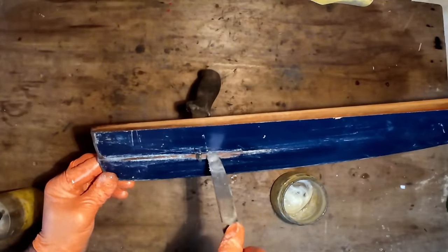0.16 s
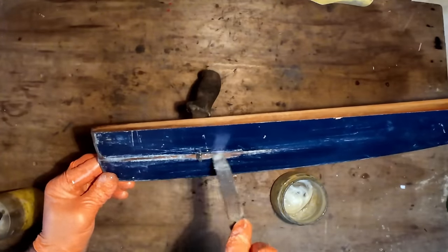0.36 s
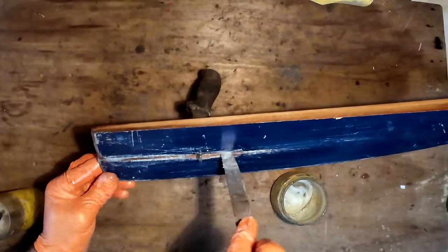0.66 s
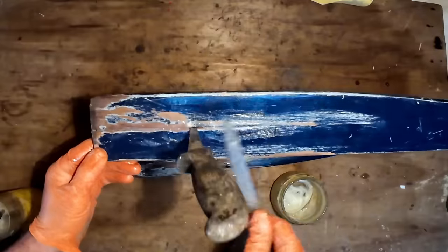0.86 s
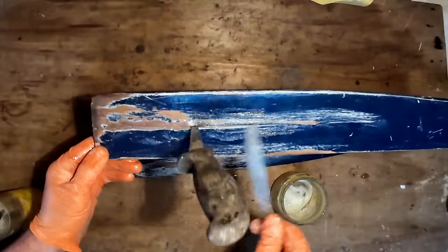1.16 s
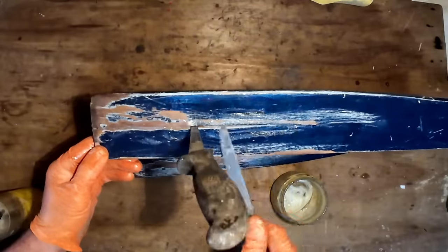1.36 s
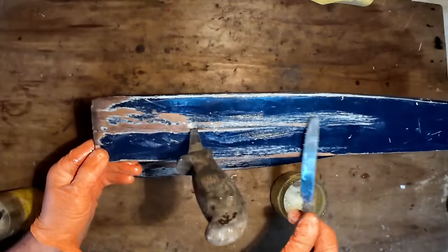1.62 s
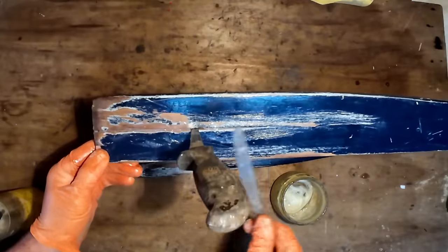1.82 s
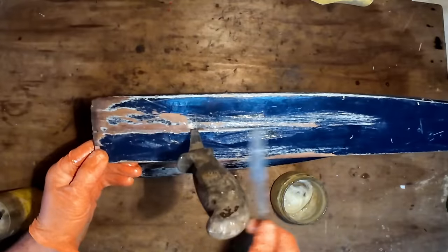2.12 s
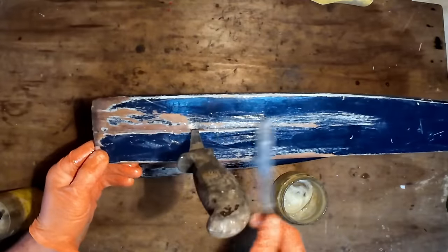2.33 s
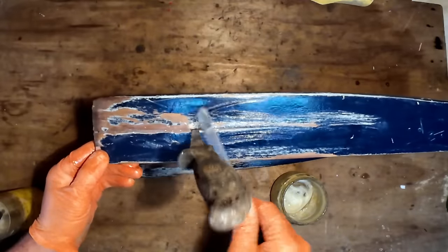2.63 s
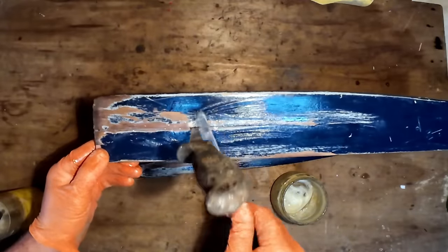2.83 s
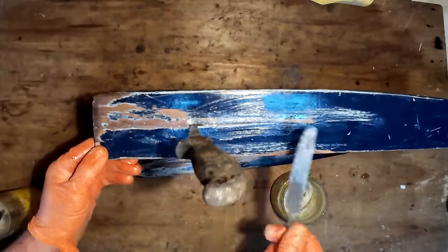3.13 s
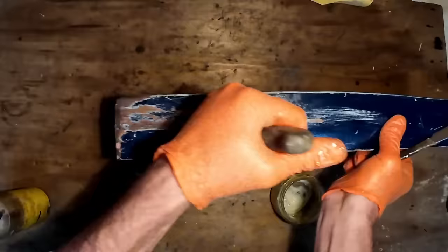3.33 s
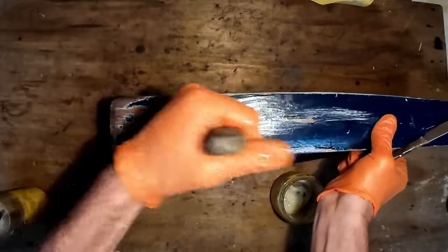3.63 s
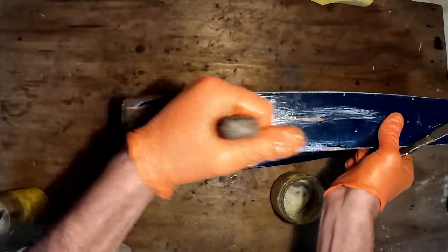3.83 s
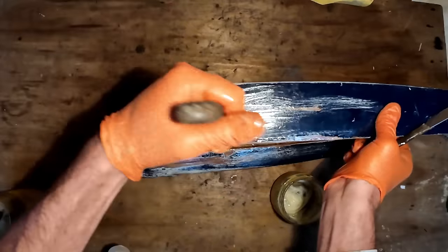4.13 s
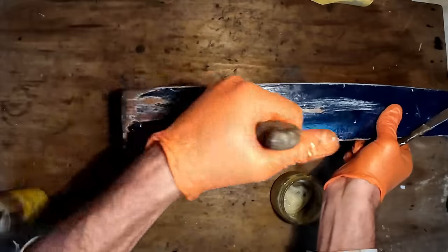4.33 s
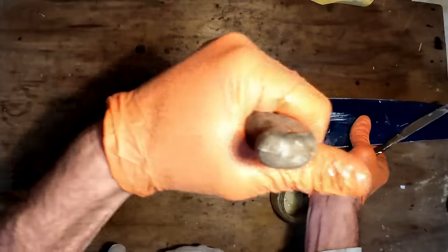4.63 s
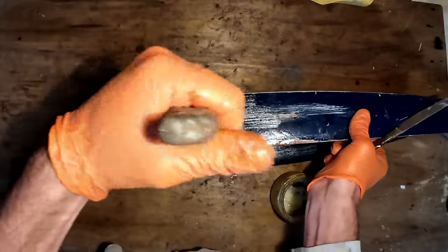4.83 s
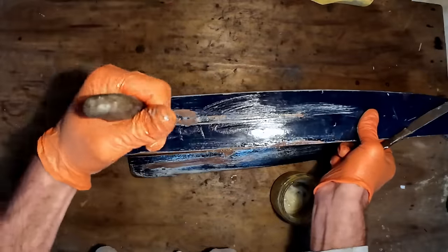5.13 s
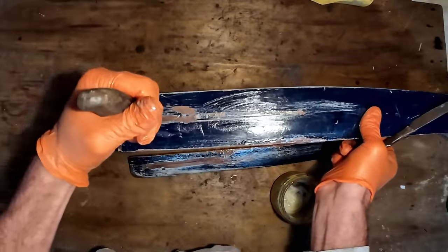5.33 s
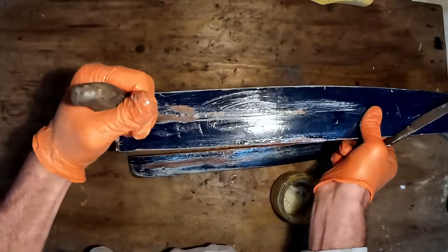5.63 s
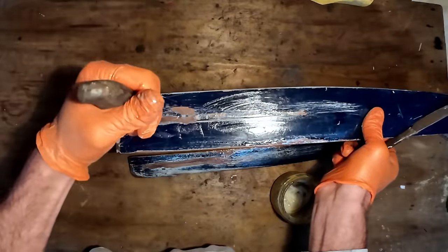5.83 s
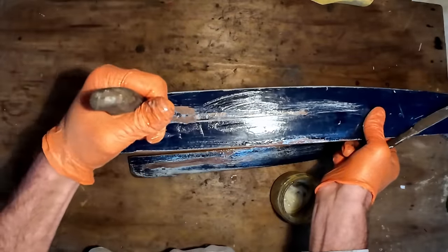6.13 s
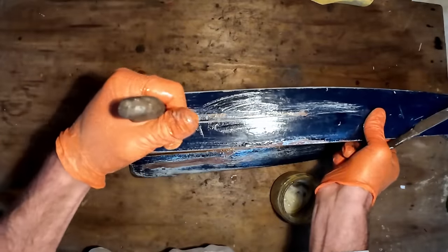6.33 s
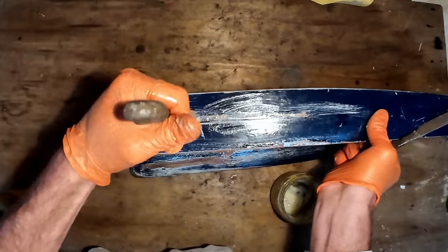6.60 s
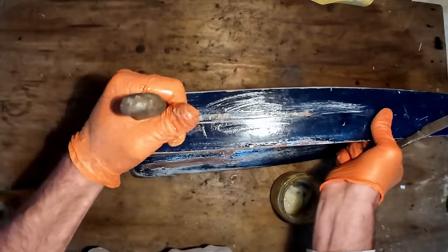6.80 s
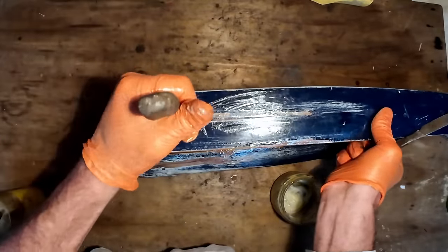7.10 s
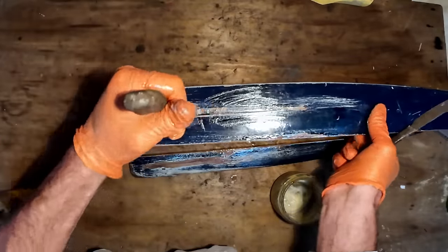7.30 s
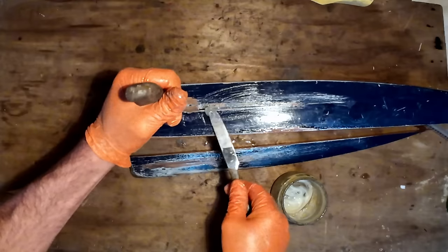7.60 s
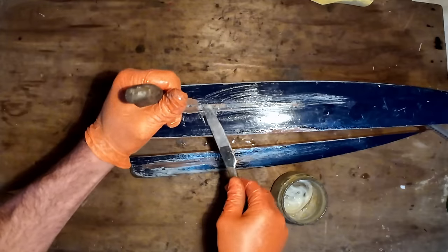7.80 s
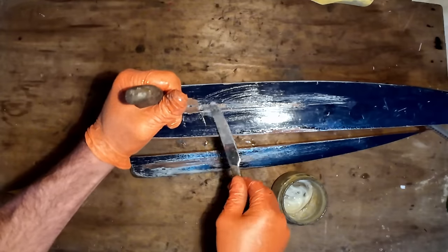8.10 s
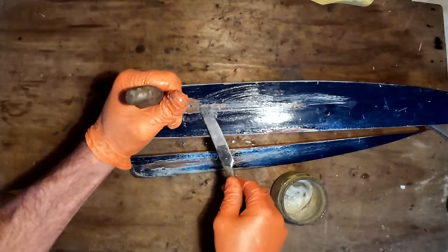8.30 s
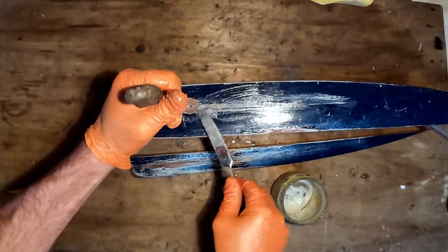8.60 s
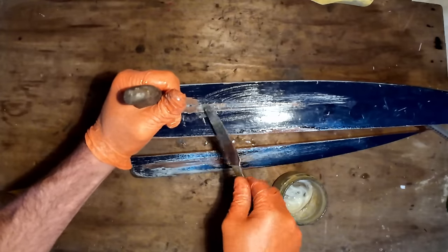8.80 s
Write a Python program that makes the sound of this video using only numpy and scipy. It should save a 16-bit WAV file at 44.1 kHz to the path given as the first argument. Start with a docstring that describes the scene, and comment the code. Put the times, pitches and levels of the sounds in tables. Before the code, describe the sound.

A constant low rumble and smooth high hiss sit under close, dry bench work with a short echo. From 0.4 to 0.7 s sticky rubber gloves give a few thin high ticks. From 0.8 s a thin knife strokes wood in short gritty wipes, with light woody taps at about 0.95, 1.2, 1.45 and 1.8; harder, bright raps follow at 2.05, 2.45, 2.65, 2.85 and 3.0. After a small lull, light knocks begin near 3.6, and the oar bumps the bench at 3.95 and 4.2. A dense tumble of deep thuds, rattles and crunching scrape peaks at 4.4-4.7, its hardest hits clipped. Dragging rumble fades by 5.4. Small knocks come at 5.5 and 5.7, faint scuffing at 6.7-6.9, sticky ticks and a soft knock around 7.2-7.4, a small tap at 8.0, then scattered glove ticks, rustle and barely audible scuffs until 8.9.

```python
"""Sticky glove ticks come first, over low rumble and high hiss; then a knife taps and wipes glue along the
split of a wooden oar blade. Later the oar is shifted: it bumps, drags and crunches on the bench.
Blows are decaying wood modes plus noise bursts; rubbing is rough noise fed through those modes or bands.
Gloves also crackle and rustle, light touches and small knocks give short notes, faint scuffs follow late,
a short echo follows the work, and the recorder clips the hardest hits."""
import sys
import numpy as np
from scipy import signal
from scipy.fft import rfft, irfft
from scipy.io import wavfile
from scipy.ndimage import uniform_filter1d

SR = 44100
rng = np.random.default_rng(int(sys.argv[2]) if len(sys.argv) > 2 else 0)


def inscribe(sig):
    """Save sig as 16-bit PCM at rate SR to the path in sys.argv[1].

    A 1-D sig is mono; a 2-D sig holds one channel per row.
    Samples are clipped to [-1, 1] before scaling.
    """
    pcm = np.round(np.clip(np.atleast_2d(sig).T, -1, 1) * 32767)
    wavfile.write(sys.argv[1], SR, pcm.astype(np.int16))


N = 394690  # samples

# Knife meets the blade: start_s, level_db, tilt_db_per_octave, crack_db (bright crack against the blow)
TAPS = [(0.947, -28, 3.5, -10), (1.178, -24.5, 3.5, -23), (1.445, -16, 1.5, -19.5), (1.515, -30, -7, -25),
        (1.558, -30.5, 8, -8), (1.792, -24.5, -10, -32), (2.048, -6.5, -0.5, -26.5), (2.224, -26, -11, -21),
        (2.464, -9, -5, -29.5), (2.647, -4.5, -2.5, -20), (2.828, -2.5, -1, -18), (2.872, -22, 0, -23),
        (2.89, -4, 4.5, 4.5), (3.02, -3, 1, -14), (3.185, -30.5, 2, -23), (8.031, -29, -0.5, -30)]
# Resonances of the blade: pitch_hz, level_db, t60_s
BLADE = [(765, -18.5, 0.033), (905.6, -8, 0.034), (1065, -8.5, 0.049), (1372.7, -6, 0.048),
         (1830, -9.5, .03), (2165, 0, 0.027), (2406, -1.5, .05), (2616, -2, 0.031), (2986, -7.5, .03),
         (3220, -9.5, 0.021), (3950, -13, 0.025), (4220, -10, 0.037), (4612, -8.5, 0.023),
         (5060, -15.5, 0.024), (6130, -15.5, 0.032), (6508, -22, 0.041)]
# Low knock of the whole blade: pitch_hz, level_db, t60_s
KNOCK = [(357, -2, 0.052), (436, -1, 0.027), (544.2, -3, 0.12)]
KNOCK_DB, KNOCK_PER_DB = -20.5, -0.12  # dB at a 0 dB tap; dB per dB of tap, so gentle taps knock more


def knife_taps():
    """Each tap rings the blade through a brief noise chatter, with a low knock and a bright crack."""
    out = np.zeros(N)
    for start_s, level_db, tilt, crack_db in TAPS:
        chatter = crack(150, 16000, 0.016, size=1200)
        body = signal.fftconvolve(ring(BLADE, tilt, scatter_db=3.5), chatter)
        # gentle taps favour the lowest knock modes
        knock = ring(KNOCK, tilt=0.98 * (level_db + 15), scatter_db=2)
        knock_gain = undb(KNOCK_DB + KNOCK_PER_DB * level_db)
        blow = body[:len(knock)] / np.abs(body).max() + knock_gain * knock
        bright = crack(2700, 15500, 0.0096) + 0.51 * crack(7800, 9600, 0.04)
        add(out, start_s, undb(level_db) * (blow + undb(crack_db) * bright))
    return out


# Knife strokes on the wood: loudest_s, level_db, rise_s, fall_s
WIPES = [(.815, -40, 0.067, 0.066), (1.04, -36.5, 0.067, .065), (1.262, -35, 0.059, 0.046),
         (1.55, -42.5, 0.14, 0.1), (1.88, -35.5, 0.1, 0.069), (2.095, -38, 0.053, 0.056),
         (2.31, -33, 0.051, 0.045), (2.503, -31, 0.047, 0.05), (2.685, -36, 0.052, .06),
         (2.87, -30.5, 0.055, 0.08), (2.925, -39, .025, 0.058), (3.05, -36.5, 0.043, .06),
         (3.21, -61, .03, 0.043)]


def knife_wipes():
    """Friction rubs the blade modes and hisses in two bands above most of them."""
    force = grit(rough_db=3, rate_hz=150)
    low_hiss = undb(-16.5) * unit(band(force, 5470, 10000))
    high_hiss = undb(-20.5) * unit(band(force, 12500, 15000))
    wood = rub(BLADE, force, wander_db=2.5, wander_hz=24.67)
    return swells(WIPES, round=2.0) * (wood + low_hiss + high_hiss)


# Short notes of light touches and small knocks, some knocks given two notes:
# start_s, level_db, pitch_hz, t60_s
TOUCHES = [(3.343, -55.5, 1145, 0.042), (3.612, -52, 1560, 0.055), (3.625, -52.5, 1150, 0.2),
           (3.67, -48, 1567, 0.098), (3.753, -61, 2270, 0.16), (3.928, -29.5, 1632, 0.025),
           (5.496, -45.5, 520, 0.11), (5.499, -55, 1640, 0.036), (5.69, -45, 1663, 0.049),
           (7.171, -39.5, 2890, 0.041), (7.418, -39, 558, 0.082), (7.43, -49, 904, 0.082),
           (8.033, -39.5, 913, 0.072), (8.769, -53.5, 929, .06)]


def short_notes():
    """Each row excites one decaying mode, with a noise burst around its pitch."""
    out = np.zeros(N)
    for start_s, level_db, pitch_hz, t60_s in TOUCHES:
        note = ring([(pitch_hz, 0, t60_s)])
        contact = crack(0.72 * pitch_hz, 2.6 * pitch_hz, 0.096)
        add(out, start_s, undb(level_db) * (note + 0.7 * contact))
    return out


# Oar bumps the bench: start_s, thud_db, then against the thud: low_shaft_db, high_shaft_db, rattle_db
BUMPS = [(3.622, -32.5, -18, -27, -27), (3.82, -40, 4.5, -17.5, -18), (3.952, -14.5, -14, -18.5, -12.5),
         (3.985, -19, -9.5, -16, -32), (4.164, -19, -3.5, -15, -23.5), (4.189, -20.5, -2, -6, -18.5),
         (4.25, -21, -13, -25, -25), (4.268, -29, -25, -6, -18), (4.36, -26, -9.5, -32, -41),
         (4.437, -4.5, -21.5, -25.5, -10), (4.455, -14, 0, 2.5, -12.5), (4.531, -12, -11.5, -9.5, -4.5),
         (4.549, -11.5, -6, -5, -8.5), (4.579, 2.5, -19.5, -21, -13.5), (4.605, -1, -8.5, -11, -20),
         (4.62, -2, -6.5, 4, -4.5), (4.662, 3.5, -21.5, -19.5, -20), (4.714, -14, -1, 4.5, -4),
         (4.742, -28.5, 8, 6, -18), (4.783, -19.5, -8, -11.5, -8), (5.495, -45.5, 10, -23, -22),
         (7.415, -49, 7, 7, -9)]
# Resonances of the bench, the oar shaft and the rattling blade: pitch_hz, level_db, t60_s
BENCH = [(62.2, -6, 0.27), (104.04, 1, 0.14), (135.3, -1, 0.064), (155, -9, 0.16), (214, -13.5, .12)]
SHAFT = [(291.3, -1.5, 0.1), (343, -6, 0.15), (386.6, -4.5, 0.08), (505, -4, 0.068), (676, -6, 0.059),
         (853, -2.5, 0.064), (1094.4, -13, 0.049)]
RATTLE = [(962, -5.5, 0.0099), (1326, -4.5, 0.046), (1559, -5, 0.03), (1850, -4.5, 0.017),
          (2386, -12.5, .02), (2605, -12.5, 0.018), (2960, -12, 0.0073)]


def oar_bumps():
    """Each bump thuds in the bench, rings the shaft and rattles the blade."""
    out = np.zeros(N)
    for start_s, thud_db, low_db, high_db, rattle_db in BUMPS:
        low_shaft = undb(low_db) * ring(SHAFT[:4], scatter_db=5)
        high_shaft = undb(high_db) * ring(SHAFT[4:], scatter_db=6.0)
        thud = ring(BENCH, scatter_db=3)
        chatter = crack(300, 9000, 0.05, size=2000)
        rattle = signal.fftconvolve(ring(RATTLE, scatter_db=5), chatter)[:12000]
        rattle = rattle / np.abs(rattle).max()
        rattle += 0.41 * crack(900, 3500, 0.088) + 0.15 * crack(4000, 14000, 0.049)
        add(out, start_s, undb(thud_db) * (low_shaft + high_shaft - thud + undb(rattle_db) * rattle))
    return out


# Oar dragged over the bench: loudest_s, rumble_db, rise_s, fall_s, grind_db (wood against the rumble)
DRAG = [(3.65, -38.5, .02, 0.12, -20.5), (3.86, -43, .09, 0.13, -8.5), (4.0, -31, .02, 0.11, -25),
        (4.22, -31.5, .03, .4, -9), (4.5, -23, .07, .06, -16.5), (4.8, -29.5, .05, 0.42, -14),
        (5.07, -39, .28, 0.24, -16.5), (5.29, -36, .13, 0.14, -9), (6.842, -45.5, .07, .11, -14.5),
        (7.32, -46, .05, 0.11, -13)]
DRAG_ROUND = 1.26  # swell shape, fairly pointed
# Gritty crunch and scrape, loud with the sliding oar, later faint scuffs alone:
# loudest_s, level_db, rise_s, fall_s
CRUNCH = [(3.95, -47.5, .03, 0.11), (4.19, -56, 0.068, .2), (4.445, -37.5, 0.063, 0.11),
          (4.63, -27.5, .17, 0.13), (4.72, -38, .02, 0.13), (6.73, -51.5, 0.099, 0.1),
          (6.85, -64, 0.066, 0.079), (8.51, -66.5, 0.071, 0.092), (8.88, -61, 0.042, 0.029)]


def oar_drag_and_scuffs():
    """One friction force rumbles the bench, grinds the shaft and crunches in the rattle modes and bands."""
    force = grit(rough_db=3.5, rate_hz=74)
    rumble = rub(BENCH, force, wander_db=4.5, wander_hz=9.5)
    grind = rub(SHAFT[:4], force, wander_db=5.5, wander_hz=12)
    crunch = rub(RATTLE[2:], force, wander_db=7.5, wander_hz=25.1)
    crunch += 0.64 * unit(band(force, 401, 2800)) + 0.06 * unit(band(force, 6993, 14980))
    grind_db = np.array(DRAG)[:, -1]
    out = swells(DRAG, DRAG_ROUND) * rumble
    out += swells(DRAG, DRAG_ROUND, grind_db) * grind
    return out + swells(CRUNCH, round=1.233) * crunch


# Sticky glove ticks: start_s, level_db
TICKS = [(0.4512, -35.5), (0.5392, -53), (0.6287, -40), (0.6669, -47), (1.2276, -37), (3.3638, -52.5),
         (4.4226, -32), (5.693, -51), (7.267, -38), (7.3807, -46), (7.404, -28.5), (7.9843, -57),
         (8.1778, -46), (8.4387, -49), (8.4756, -42), (8.8662, -43)]
# Glove rustle: loudest_s, level_db, rise_s, fall_s
RUSTLE = [(3.39, -63.5, 0.044, 0.42), (3.92, -62.5, 0.44, .18), (4.19, -71, .04, .3),
          (4.88, -69.5, .13, .11), (5.38, -61, 0.14, .12), (5.69, -66, 0.17, .09), (6.8, -69, 0.18, .19),
          (7.256, -75, .16, 0.16), (7.4, -73, .04, .08), (7.99, -75, .15, 0.21), (8.175, -74.5, .03, .12),
          (8.47, -69, 0.031, .15), (8.888, -66, .19, 0.11)]


def gloves():
    """Tacky rubber lets go in thin high ticks, crackles faintly all along and rustles in swells."""
    out = np.zeros(N)
    for start_s, level_db in TICKS:
        tick = crack(9000, 22000, 0.012) + 0.3 * crack(2500, 14000, 0.02)
        add(out, start_s, undb(level_db) * tick)
    # about 500 pops a second, a few much stronger than the rest
    pops = (rng.random(N) < 500 / SR) * undb(3 * rng.exponential(size=N))
    crackle = unit(signal.fftconvolve(pops, crack(12400, 14300, 0.02, size=2000))[:N])
    force = grit(rough_db=3, rate_hz=120)
    rustle = unit(band(force, 12300, 14000) + 1.1 * band(force, 3336, 4770))
    return out + undb(-85) * crackle + swells(RUSTLE, round=1.1) * rustle


SHED_T60_S, SHED_DB, SHED_HZ = 0.14, -14, 5840  # echo decay, level, upper band edge


def shed_echo(work):
    """Short echo off bench and walls: the work smeared by a decaying noise tail of unit energy."""
    tail = crack(190, SHED_HZ, SHED_T60_S, size=16000)
    echo = signal.fftconvolve(work, tail / np.sqrt(np.sum(tail ** 2)))[:N]
    return undb(SHED_DB) * echo


# Spectrum shapes of the low rumble and the high hiss: pitch_hz, density_db (relative, per Hz)
RUMBLE = [(8.8, -26.5), (15, 2), (71, -18), (120, -25), (198, -32), (618, -42.5), (693, -43.5),
          (813, -44.5), (3500, -53.5), (4550, -84.5), (7700, -120)]
HISS = [(1760, -46), (3000, -19), (3400, -15), (3810, -14), (4260, -13.5), (5250, -4.5), (6350, -1.5),
        (7200, -5), (7940, -1), (9660, -9), (12200, -38), (16000, -43.5)]
RUMBLE_DB, HISS_DB = -46, -59.5  # overall rms levels


def air():
    """Steady low rumble and a smooth band of high hiss, both spectrally shaped noise."""
    return shaped(RUMBLE, RUMBLE_DB) + shaped(HISS, HISS_DB)


def ring(modes, tilt=0., scatter_db=0., size=12000):
    """One blow: decaying modes, each struck a little differently and slightly detuned; peak 1."""
    hz, db, t60 = np.transpose(modes)[:, :, None]
    strike, detune = rng.standard_normal((2, len(modes), 1))
    t = np.arange(size) / SR
    # tilt is in dB per octave about 2 kHz
    gain = undb(db + tilt * np.log2(hz / 2000) + scatter_db * strike)
    sign = (-1.) ** np.arange(len(modes))[:, None]
    decay = np.exp(-np.log(1000) * t / t60)
    tone = np.sin(2 * np.pi * hz * (1 + 0.017 * detune) * t)
    x = np.sum(sign * gain * decay * tone, 0)
    return x / np.abs(x).max()


def crack(lo_hz, hi_hz, t60, size=12000):
    """A band-passed burst of exponentially dying noise; peak 1."""
    decay = np.exp(-np.log(1000) * np.arange(size) / SR / t60)
    x = band(rng.standard_normal(size) * decay, lo_hz, hi_hz)
    return x / np.abs(x).max()


def grit(rough_db, rate_hz):
    """Friction force: noise whose strength catches and slips at random."""
    return rng.standard_normal(N) * undb(rough_db * walk(rate_hz))


def rub(modes, force, wander_db, wander_hz):
    """Friction force through a body's modes; as the contact moves, each is fed more or less; rms 1."""
    out = 0
    for k, (hz, db, t60) in enumerate(modes):
        radius = np.exp(-np.log(1000) / t60 / SR)
        angle = 2 * np.pi * hz / SR
        fed = force * undb(db + wander_db * walk(wander_hz))
        poles = [1, -2 * radius * np.cos(angle), radius * radius]
        out = out + (-1) ** k * signal.lfilter([np.sin(angle)], poles, fed)
    return unit(out)


FADE_DB = 30  # a gesture lies this far below its loudest moment at its rise and fall times


def swells(rows, round, extra_db=0):
    """Gain of gestures that swell to a loudest moment and die away; round 1 is pointed, 2 a dome."""
    out, t = np.zeros(N), np.arange(N) / SR
    extras = extra_db + np.zeros(len(rows))
    for (loudest_s, db, rise, fall), extra in zip(np.array(rows)[:, :4], extras):
        near = slice(max(int((loudest_s - 2 * rise) * SR), 0), int((loudest_s + 2 * fall) * SR))
        from_peak = t[near] - loudest_s
        away = np.where(from_peak < 0, -from_peak / rise, from_peak / fall)
        out[near] += undb(db + extra - FADE_DB * away ** round)
    return out


def walk(rate_hz):
    """Random values held 1 / rate s, then slewed by a moving average."""
    k = max(int(SR / rate_hz), 1)
    held = np.repeat(rng.standard_normal(N // k + 1), k)[:N]
    return uniform_filter1d(held, k)


def shaped(points, db):
    """Steady noise with the given spectrum, interpolated over log frequency."""
    hz, shape_db = np.transpose(points)
    f = np.maximum(np.arange(N // 2 + 1) * SR / N, 1)
    gain = undb(np.interp(np.log(f), np.log(hz), shape_db))
    return undb(db) * unit(irfft(rfft(rng.standard_normal(N)) * gain, N))


def undb(db):
    """dB to gain."""
    return np.exp(np.asarray(db, float) * np.log(10) / 20)


def unit(x):
    """Scale to rms 1."""
    return x / np.sqrt(np.mean(x ** 2))


def band(x, lo_hz, hi_hz, order=2):
    """Band-pass, its upper edge held below the Nyquist limit."""
    edges = [lo_hz, min(hi_hz, .45 * SR)]
    return signal.sosfilt(signal.butter(order, edges, "band", fs=SR, output="sos"), x)


def add(out, s, x):
    """Mix a sound in at time s."""
    i = int(s * SR)
    out[i:i + len(x)] += x[:N - i]


def scene():
    """The work, its short echo, and the air."""
    work = knife_taps() + knife_wipes() + short_notes() + oar_bumps() + oar_drag_and_scuffs() + gloves()
    return (work + shed_echo(work) + air())[None]


CLIP, TOP_HZ = 0.72, 16200  # clipping amplitude; low-pass edge


def record(dry):
    """The input clips flat, then a steep low-pass cuts the top."""
    low_pass = signal.ellip(8, .2, 70, TOP_HZ, fs=SR, output="sos")
    return signal.sosfilt(low_pass, np.clip(dry, -CLIP, CLIP))


dry = scene()
out = record(dry)
inscribe(out)
```